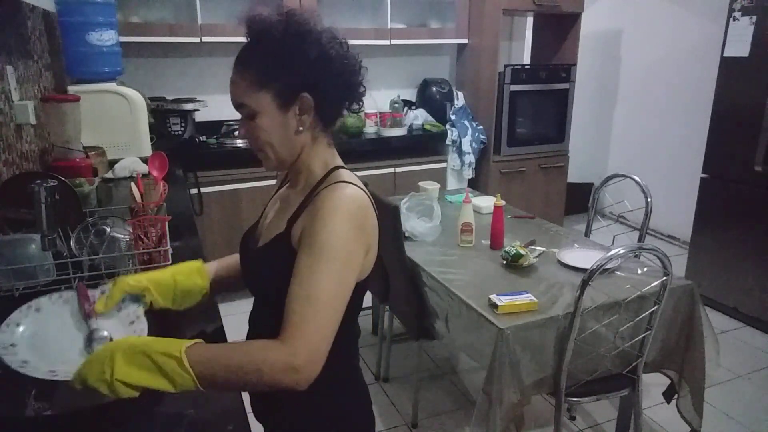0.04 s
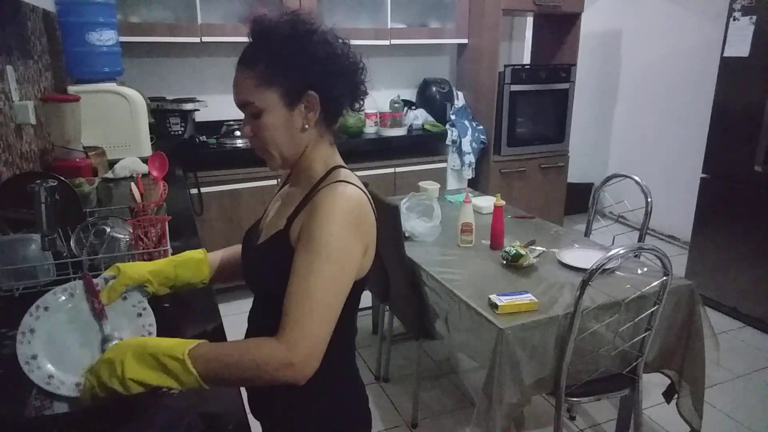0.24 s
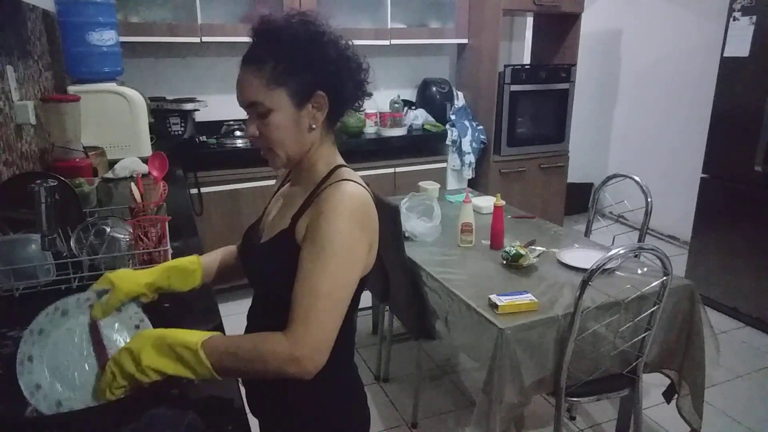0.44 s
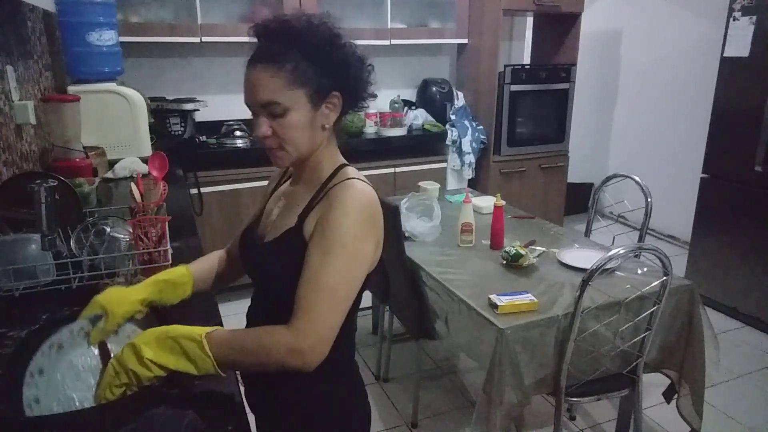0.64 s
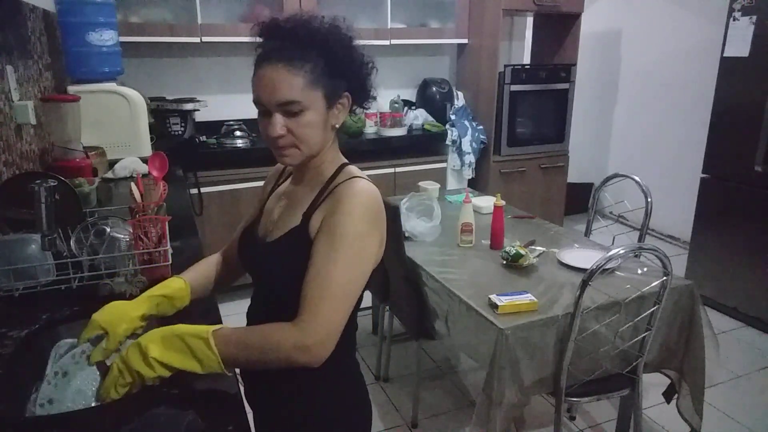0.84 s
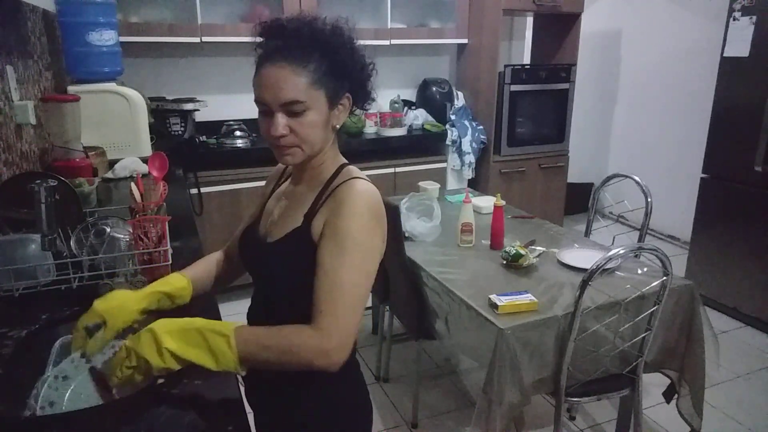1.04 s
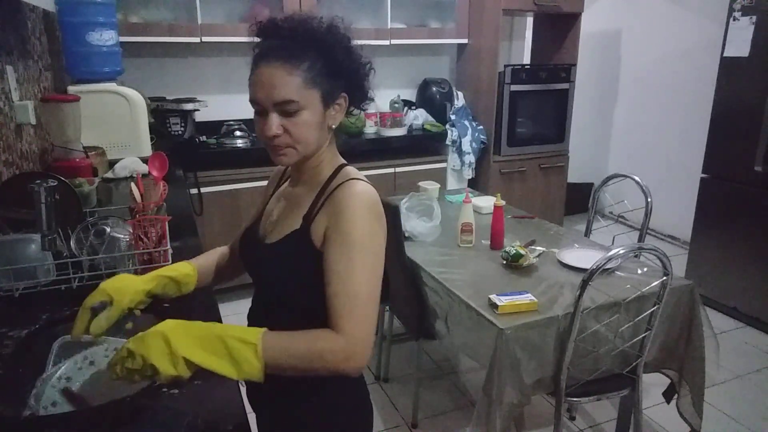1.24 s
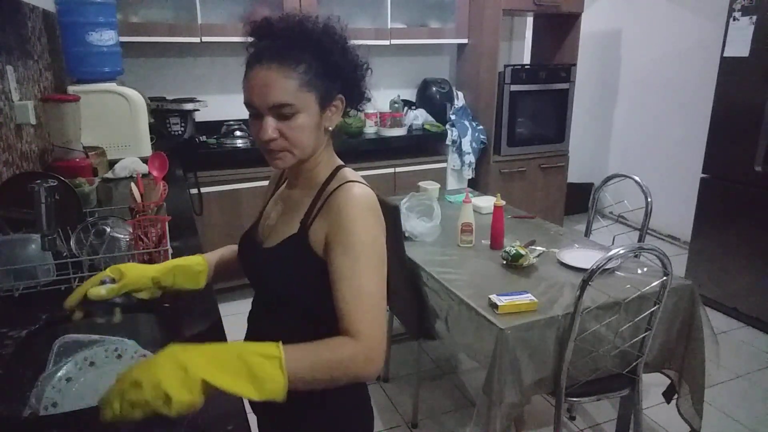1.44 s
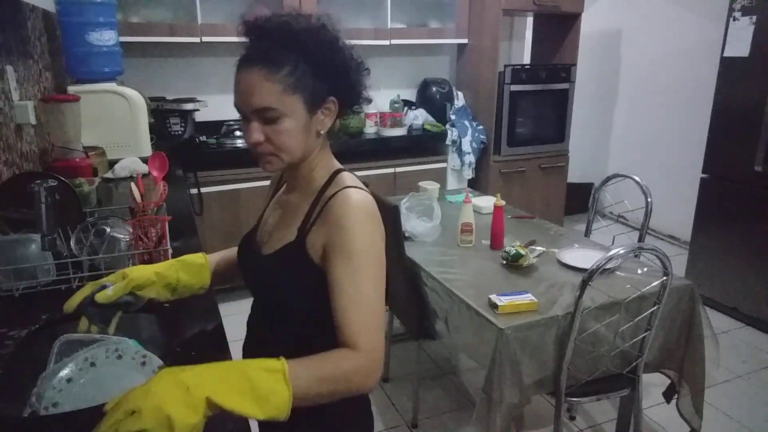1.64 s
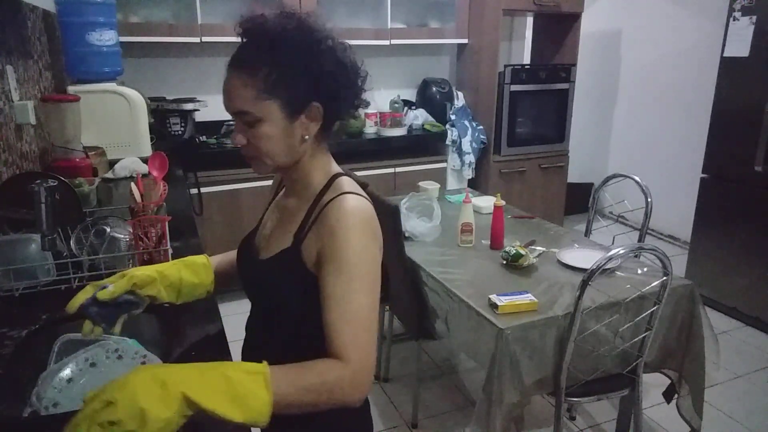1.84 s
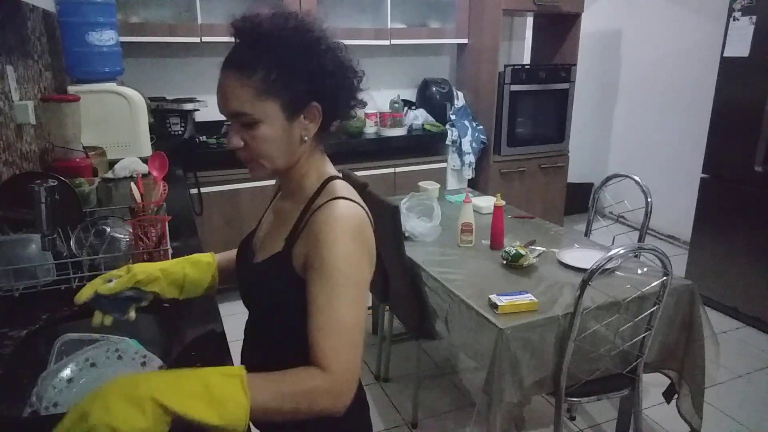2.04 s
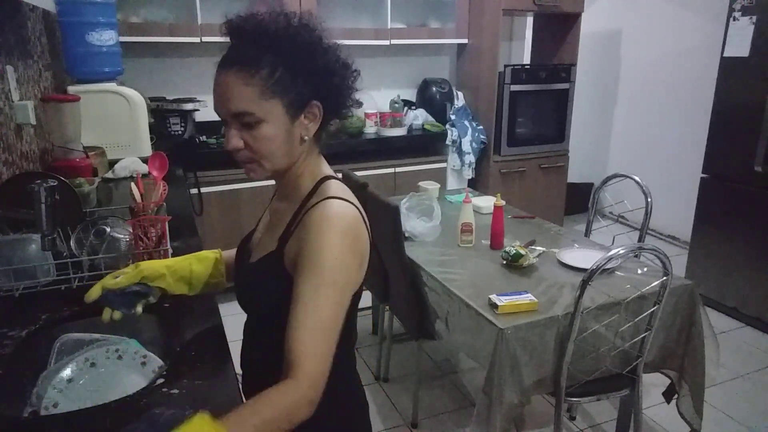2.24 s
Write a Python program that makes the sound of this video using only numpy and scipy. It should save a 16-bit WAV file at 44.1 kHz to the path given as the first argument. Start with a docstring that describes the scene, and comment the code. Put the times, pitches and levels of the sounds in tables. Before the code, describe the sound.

Dishes clink and clatter in a kitchen sink as they are washed by hand.

```python
"""A wet rub, a tap on a cup, then a plate clatters against cutlery and dishes: washing up by hand.
Each contact is a short noise clack plus the ringing modes of the thing struck.
Wet gloves and sponge swish; the basin booms when pushed. Clatter and rubs echo in a tiled kitchen,
coloured by the dish rack. Mains hum and faint room noise run underneath."""
import sys
import numpy as np
from scipy import signal
from scipy.fft import rfft, irfft
from scipy.io import wavfile
from scipy.ndimage import uniform_filter1d

SR = 44100
rng = np.random.default_rng(int(sys.argv[2]) if len(sys.argv) > 2 else 0)


def log_audio(samples):
    """Write samples as a 16-bit WAV file to the path given in sys.argv[1]."""
    # one column per channel
    frames = np.atleast_2d(samples).T
    # limit to full scale, then quantise
    limited = np.clip(frames, -1, 1)
    pcm = np.round(limited * 32767).astype(np.int16)
    wavfile.write(sys.argv[1], SR, pcm)


N = 101429

# Six noise bands: f/Hz
BAND_CENTRES_HZ = [250, 630, 1600, 3900, 7700, 12600]
# Contacts: t/s, thing struck, relative ring level/dB, clack decay/s, 6 x relative band level/dB
STRIKES = [ (0.068, "cup", -27.5, 0.0022, -32, -29, -20, -37, -37, -47),
           (.206, "plate", -9.5, 0.021, -22.5, -12, -27, -8.5, -11, -20.5),
           (0.219, "plate", -20, 0.015, -30, -32, -22, -21, -26, -40),
           (0.227, "plate", -6, 0.015, -44, -32, -30, -20, -27, -18),
           (0.242, "plate", -29, 0.018, -14, -28, -12.5, -11, -35, -35),
           (0.269, "plate", -11.5, 0.033, -38, -12.5, -38, -17.5, -26, -45),
           (0.434, "cutlery", -5, 0.027, -33, -19, -19, -8.5, -15, -20),
           (0.454, "cutlery", -6, 0.029, -33, -16.5, -20.5, -10, -18, -28),
           (0.666, "cutlery", -18.5, 0.016, -25, -20.5, -31, -20, -24.5, -38),
           (0.683, "plate", -38, 0.021, -55, -19, -30.5, -14.5, -24.5, -38),
           (0.762, "spoon", -4, 0.011, -22, -21, -30, -12.5, -24, -25.5),
           (0.77, "basin", -12, 0.0091, -18, -17, -30, -13, -19, -27),
           (0.77, "rim", -21, 0.0065, -29, -27, -38, -15, -40, -40),
           (0.785, "basin", -11.5, 0.018, -21, -24, -33, -19.5, -31, -33),
           (1.020, "rim", -43, 0.0089, -45, -36.5, -31.5, -22, -29.5, -32.5),
           (1.071, "cup", -2, 0.021, -42, -29.5, -23, -27, -31, -43),
           (1.105, "cup", -10, 0.0039, -38, -45, -29, -40, -47, -56),
           (1.173, "rim", -4.5, 0.01, -24, -20.5, -15.5, -14.5, -16, -25.5),
           (1.245, "rim", -19, .008, -58, -51, -18, -24, -37, -57),
           (1.425, "cup", -23, 0.021, -62, -64, -30.5, -27.5, -40, -46),
           (1.456, "rim", -24.5, 0.013, -58, -65, -43, -38, -42, -45),
           (1.485, "bowl", -6.5, 0.0083, -27, -46, -14, -7, -21, -18),
           (1.489, "bowl", -9, 0.0076, -43, -22, -43, -8, -19.5, -37),
           (1.51, "pot", -2, 0.021, -37, -35.5, -17, -30, -25.5, -47),
           (1.591, "bowl", -22.5, 0.012, -34, -37, -25, -14, -19, -30.5),
           (1.839, "bowl", -19.5, 0.028, -37, -44, -31.5, -29.5, -38, -42),
           (2.004, "tine", -4.5, 0.034, -73, -51, -93, -43.5, -50, -54), ]
# Modes of each thing: f/Hz, relative level/dB, T60/s before glove damping
PLATE_MODES = [(319, -23, 0.53), (392, -24, 0.52), (643, -13.5, 0.65), (704, -23, 0.68), (1314, -29, 0.68),
               (1736, -22, 0.56), (1849, -21, 0.68), (2001, -21, 0.59), (2038, -17, 0.62),
               (2789, -11, 0.37), (2844, -20, 0.41), (3035, -22, 0.9), (3103, -25, 0.8), (3706, -22, 0.52),
               (3735, -23, 0.52), (4704, -22, 0.55), (4753, -23, 0.57), (5160, -17, 0.62),
               (5705, -26, 0.55), (5915, -25, 0.54), (5955, -24, 0.54), (6479, -20, 0.48),
               (7196, -26, 0.61), (8424, -28, 0.45), (8588, -20, 0.44), (10742, -35, 0.63),
               (11376, -30, 0.54), (13534, -29, 0.42), (13929, -28, 0.4)]
CUTLERY_MODES = [(2795, -24, .8), (2860, -23, .9), (3032, -26, .85), (3074, -29, .85), (4206, -26, .67),
                 (4245, -27, .64), (4340, -27, .6), (4381, -19, .58), (4418, -18, .58), (4475, -25, .57),
                 (4748, -26, .49), (5102, -26, .63), (5157, -26, .63), (5689, -25, .48), (6495, -22, .5),
                 (6854, -26, .5), (8534, -21, .43), (9586, -31, .46), (10763, -33, .44), (11034, -28, .46),
                 (13562, -28, .36), (13885, -28, .36)]
CUP_MODES = [(865, -35, .3), (920, -33, .3), (966, -29, .3), (1003, -33, .3), (1608, -24, .13),
             (2315, -34, .18), (3042, -33, .28), (4445, -28, .12), (4794, -31, .3)]
RIM_MODES = [(490, -35, .4), (525, -15, .06), (545, -32, .4), (670, -35, .6), (1308, -31, .48),
             (1550, -31, .6), (1764, -33, .58), (2000, -30, .4), (2330, -33, .3), (3067, -27, .65),
             (3128, -35, .65), (4412, -25, .6), (4425, -22, .08), (4535, -31, .65), (4759, -32, .6),
             (5223, -27, .25), (7051, -34, .62), (8997, -37, .52), (9932, -39, .4), (10621, -40, .52),
             (15190, -39, .35)]
BOWL_MODES = [(2241, -29, .44), (2280, -21, .06), (2323, -29, .41), (3079, -29, .5), (3140, -19, .07),
              (3167, -25, .53), (3250, -31, .55), (3688, -29, .34), (3760, -20, .05), (4255, -33, .41),
              (4550, -19, .05), (5223, -22, .3), (5250, -20, .08), (5650, -20, .05), (7561, -35, .38),
              (9037, -36, .61), (10636, -36, .36)]
POT_MODES = [(1137, -35, .63), (1300, -25, .07), (1336, -28, .6), (1618, -38, .68)]
SPOON_MODES = [(4250, -22, .14), (5200, -18, .06), (5420, -18, .04)]
TINE_MODES = [(7080, -51, .3), (7250, -48, .35), (7400, -51, .3)]
BASIN_MODES = [(189.6, -34, 0.84), (268, -23, 0.25), (385, -26, 0.67), (845, -24.5, 0.57), (916, -25, 0.43)]
MODES = {"plate": PLATE_MODES, "cutlery": CUTLERY_MODES, "cup": CUP_MODES, "rim": RIM_MODES,
         "bowl": BOWL_MODES, "pot": POT_MODES, "spoon": SPOON_MODES, "tine": TINE_MODES,
         "basin": BASIN_MODES}
# Sponge and glove rubs: t/s, rise/s, decay/s, 6 x relative band level/dB
WET_RUBS = [ (0., 0.00079, 0.052, -30, -34, -40, -43, -51, -47),
            (.12, 0.05, 0.029, -41, -43, -63, -62, -66, -70),
            (0.669, 0.02, 0.01, -52, -29, -22.5, -29, -23.5, -30),
            (.80, 0.011, 0.083, -32, -35.5, -32, -51, -42, -46),
            (0.925, 0.005, 0.0055, -23, -49, -45, -52, -27, -33.5),
            (1.085, 0.028, 0.033, -24.5, -57, -46, -59, -68, -68),
            (1.50, 0.054, 0.31, -43, -50.5, -35, -56, -63, -67), ]
# Pushes on the basin: t/s, swell/s, hold/s, f/Hz, peak level/dB
BASIN_BOOMS = [(0.722, 0.016, 0.017, 101, -22.5), (0.759, 0.022, 0.028, 97.7, -20.5),
               (1.092, 0.063, 0.019, 98.3, -31.5), (1.813, 0.055, 0.033, 100.4, -21)]
# Mains hum: f/Hz, rms level/dB
HUM_PARTIALS = [(49.8, -50), (99.8, -45.5)]
# Room noise: f/Hz, relative density/dB
AIR_SPECTRUM = [(32, -30), (45, 2), (110, 2.5), (200, -2.5), (400, -17), (1000, -32.5), (4000, -20.5),
                (9000, -29.5), (16000, -35)]
# Echo decay: f/Hz, T60/s
ECHO_T60 = [(200, 0.81), (700, 0.98), (2000, 0.7), (4500, 0.85), (9000, 0.53), (15000, 0.5)]
# Echo colour: f/Hz, relative level/dB
ECHO_SPECTRUM = [(200, 2), (600, 3.5), (950, 2.5), (1400, 1), (2500, 1), (3700, -9.5), (6000, -5),
                 (14000, 2)]
# Broad resonances of racked dishes: f/Hz, half width/Hz, relative level/dB
RACK_PEAKS = [(3070, 130, 11), (4270, 480, 7.5), (5420, 230, 4)]


def rings(level_db=3, rise_s=0.00028, glove_db_per_s_khz=7, tilt_db_per_khz=0.1147,
          waver_db=3, waver_hz=64):
    """Contacts feed energy to modes that waver as they die; a wet glove damps the high ones most."""
    out, t = np.zeros(N), since(0)
    for name, modes in MODES.items():
        energy_in = sum(undb(db) ** 2 * np.diff(1 - np.exp(-since(start_s) / rise_s), prepend=0)
                        for start_s, thing, db, *_ in STRIKES if thing == name)
        for hz, db, t60_s in modes:
            khz = hz / 1000
            # Energy kept per sample; factor 2 as energy is amplitude squared.
            retained = fade(2 / SR, t60_s) * undb(-2 * glove_db_per_s_khz * khz / SR)
            energy = signal.lfilter([1], [1, -retained], energy_in + 1e-24)
            waver_rad = 0.22 + 0.10 * khz
            phase = 2 * np.pi * (hz * t + rng.random()) + waver_rad * wander(waver_hz)
            gain = undb(db + tilt_db_per_khz * khz + waver_db * wander(waver_hz))
            out += gain * np.sqrt(energy) * np.sin(phase)
    return undb(level_db) * out


def clacks(level_db=-3, rise_s=0.0019, chatter_db=3, chatter_hz=330, overtone_db=-8):
    """Each contact gives a hard, chattering crack that also excites high overtones."""
    out = np.zeros(N)
    for name in MODES:
        cracks = sum(band_noise(bands_db) * ramp(start_s, rise_s) * np.exp(-since(start_s) / decay_s)
                     for start_s, thing, _, decay_s, *bands_db in STRIKES if thing == name)
        cracks *= unit_rms(undb(chatter_db * wander(chatter_hz)))
        out += cracks + undb(overtone_db) * convolve(cracks, overtones())
    return undb(level_db) * out


def overtones(count=70, t60_s=0.12):
    """Unit-energy impulse response of a dish's scattered high modes."""
    t = np.arange(SR // 2) / SR
    hz = np.linspace(2300, 16000, count) + rng.uniform(-110, 110, count)
    phase = rng.uniform(0, 2 * np.pi, count)
    ring = np.sin(2 * np.pi * hz[:, None] * t + phase[:, None]).sum(0) * fade(t, t60_s)
    return ring / np.linalg.norm(ring)


def rubs(level_db=-3.5, grain_db=3, grain_hz=250):
    """Sponge and gloves on wet china: short, grainy swishes."""
    swishes = sum(band_noise(bands_db) * ramp(start_s, rise_s)
                  * np.exp(-since(start_s + rise_s) / decay_s)
                  for start_s, rise_s, decay_s, *bands_db in WET_RUBS)
    grain = unit_rms(undb(grain_db * wander(grain_hz)))
    return undb(level_db) * swishes * grain


def booms(decay_s=0.0057):
    """The basin's low mode swells under a push, holds and dies fast."""
    out = np.zeros(N)
    for start_s, swell_s, hold_s, hz, db in BASIN_BOOMS:
        envelope = ramp(start_s, swell_s) * np.exp(-since(start_s + swell_s + hold_s) / decay_s)
        out += undb(db) * envelope * np.sin(2 * np.pi * hz * since(start_s))
    return out


def kitchen(build_s=0.011):
    """Unit-energy impulse response of tiled room and rack; the top treble dies first."""
    t, f = since(0), bins_hz()
    spectrum = rfft(noise(*np.array(ECHO_SPECTRUM).T)) * rack(f)
    hz, t60s = np.array(ECHO_T60).T
    tail = np.zeros(N)
    for selector, t60_s in zip(np.eye(len(hz)), t60s):
        band_gain = np.interp(np.log(f), np.log(hz), selector)
        tail += irfft(spectrum * band_gain, N) * fade(t, t60_s)
    tail *= 1 - np.exp(-t / build_s)
    return tail / np.linalg.norm(tail)


def rack(f, count=64, half_width_hz=20, narrow_db=4):
    """Gain at f/Hz of racked dishes ringing along: a few broad resonances, many narrow ones."""
    scattered_hz = np.linspace(2000, 16000, count) + rng.uniform(-60, 60, count)
    peaks = RACK_PEAKS + [(hz, half_width_hz, narrow_db) for hz in scattered_hz]
    return 1 + sum(undb(db) / (1 + ((f - hz) / half_hz) ** 2) for hz, half_hz, db in peaks)


def mains_hum(waver_db=1.2, waver_hz=13.6):
    """Mains fundamental and octave, each wavering in level."""
    return sum(np.sqrt(2) * undb(db + waver_db * wander(waver_hz))
               * np.sin(2 * np.pi * (hz * since(0) + rng.random())) for hz, db in HUM_PARTIALS)


def room_noise(rms_db=-46):
    """Faint, steady noise, strongest in the bass."""
    return undb(rms_db) * unit_rms(noise(*np.array(AIR_SPECTRUM).T))


def undb(db):
    """Decibels to gain."""
    return 10 ** (np.asarray(db) / 20)


def unit_rms(x):
    """Scale to rms 1."""
    return x / np.sqrt(np.mean(x ** 2))


def since(start_s):
    """Seconds since start_s, zero before."""
    return np.maximum(np.arange(N) / SR - start_s, 0)


def ramp(start_s, rise_s):
    """Linear rise from 0, held at 1."""
    return np.minimum(since(start_s) / rise_s, 1)


def fade(t, t60_s):
    """Exponential decay, 60 dB per t60_s."""
    return np.exp(-np.log(1000) * t / t60_s)


def bins_hz():
    """FFT frequencies, floored at 1 Hz."""
    return np.maximum(np.fft.rfftfreq(N, 1 / SR), 1)


def noise(hz, db):
    """Noise whose density follows f/Hz, level/dB points."""
    gain = undb(np.interp(np.log(bins_hz()), np.log(hz), db))
    return irfft(rfft(rng.standard_normal(N)) * gain, N)


def band_noise(bands_db):
    """Noise from six band levels, without deep bass."""
    widths_hz = np.array([250, 600, 1500, 3500, 4000, 6000])
    density_db = np.array(bands_db) + 10 * np.log10(SR / 2 / widths_hz)
    return noise([80, 190] + BAND_CENTRES_HZ, np.r_[density_db[0] - 30, density_db[0] - 2, density_db])


def wander(rate_hz):
    """Smoothed random steps, spread near 1."""
    hold = int(SR / rate_hz)
    steps = np.repeat(rng.standard_normal(N // hold + 2), hold)
    return 1.35 * uniform_filter1d(uniform_filter1d(steps, hold), hold)[:N]


def convolve(x, response):
    """Apply an impulse response, cut to N samples."""
    return signal.fftconvolve(x, response)[:N]


def scene(ring_send_db=-19.5, noise_send_db=-4):
    """Mono mix: dishes and rubs with their echo, basin, hum, room noise."""
    ring = rings()
    bursts = clacks() + rubs()
    echo = convolve(undb(ring_send_db) * ring + undb(noise_send_db) * bursts, kitchen())
    return (ring + bursts + echo + booms() + mains_hum() + room_noise())[None]


def record(dry):
    """The microphone rounds the loudest peaks and cuts the top."""
    ceiling, cutoff_hz = 0.9, 15800
    rounded = dry / (1 + (dry / ceiling) ** 4) ** (1 / 4)
    return signal.sosfilt(signal.ellip(10, 0.2, 70, cutoff_hz, fs=SR, output="sos"), rounded)


dry = scene()
out = record(dry)
log_audio(out)
```